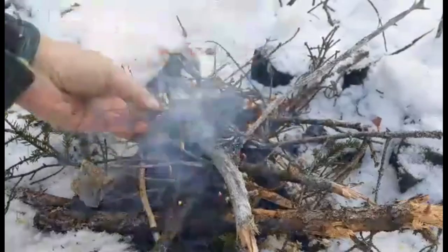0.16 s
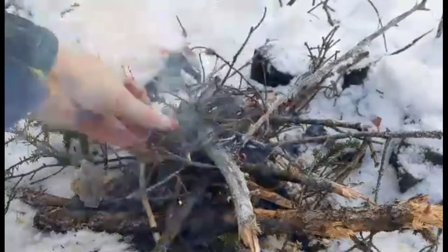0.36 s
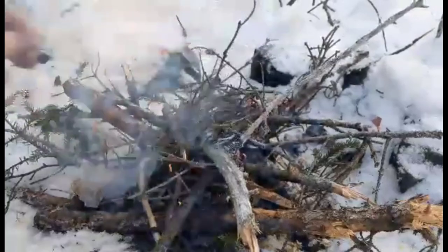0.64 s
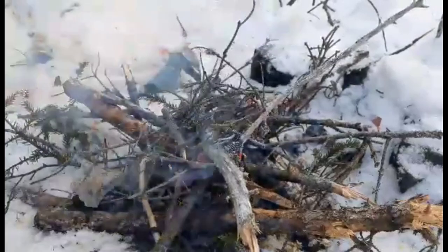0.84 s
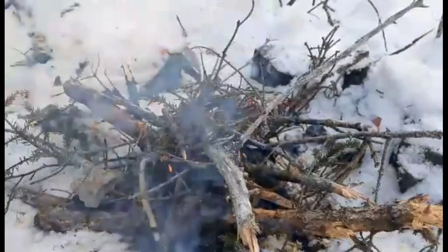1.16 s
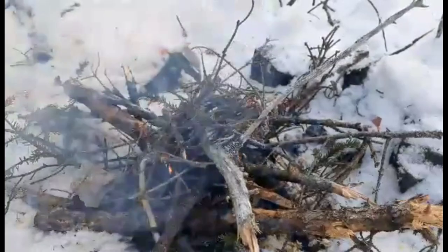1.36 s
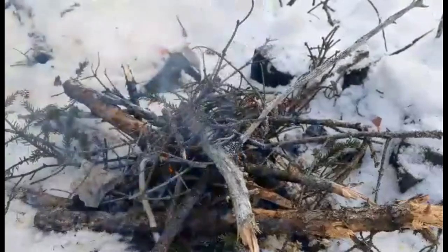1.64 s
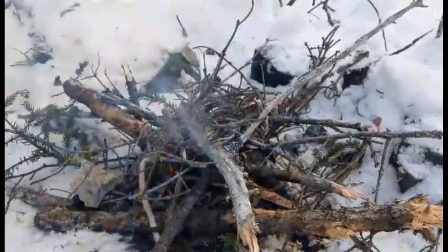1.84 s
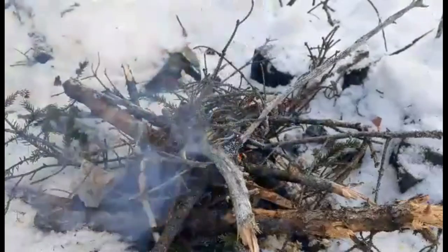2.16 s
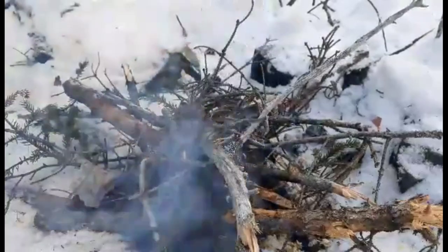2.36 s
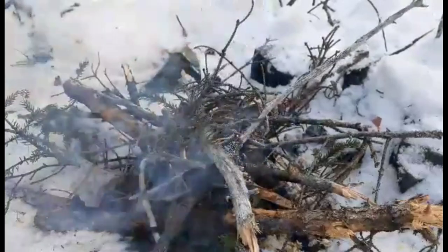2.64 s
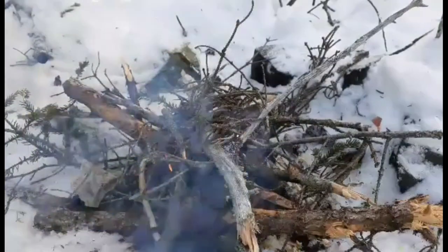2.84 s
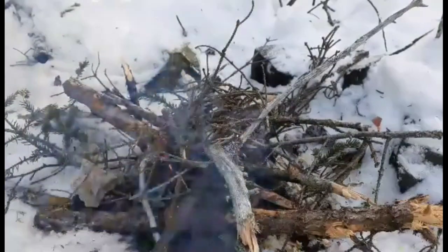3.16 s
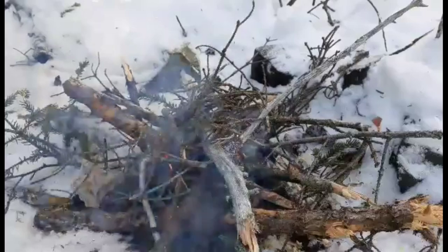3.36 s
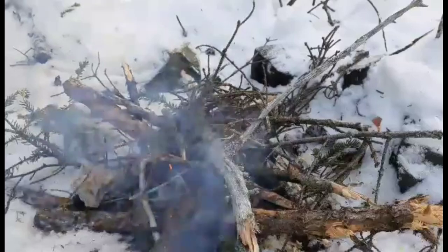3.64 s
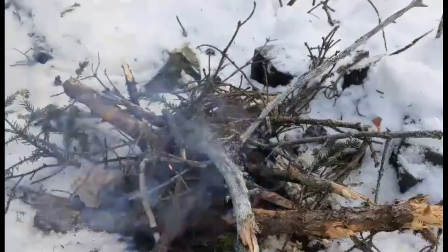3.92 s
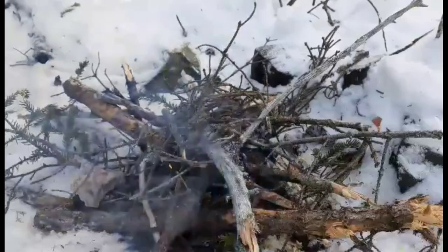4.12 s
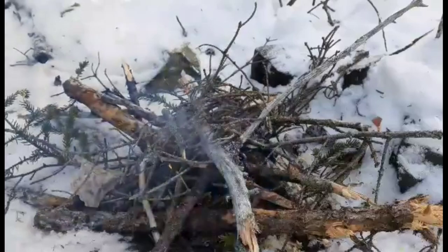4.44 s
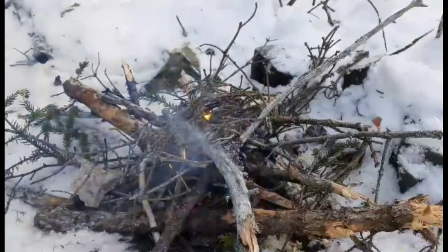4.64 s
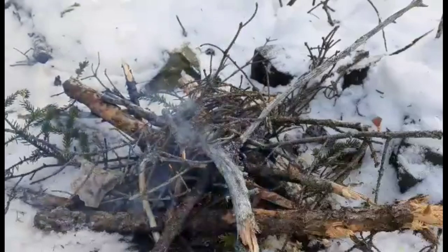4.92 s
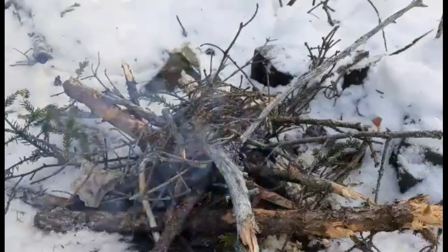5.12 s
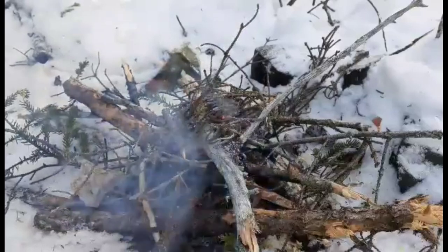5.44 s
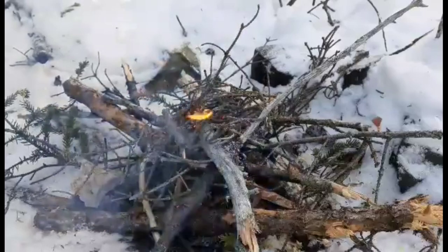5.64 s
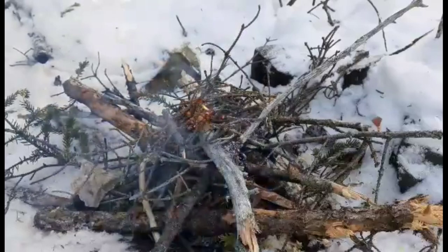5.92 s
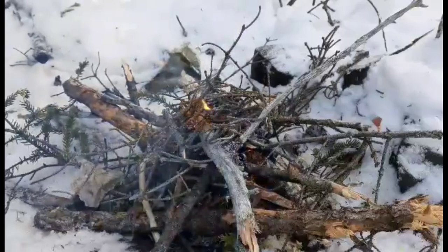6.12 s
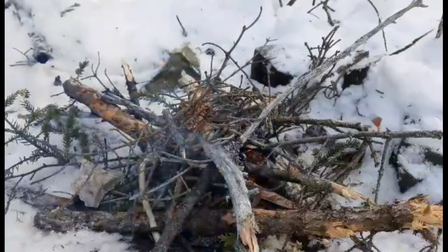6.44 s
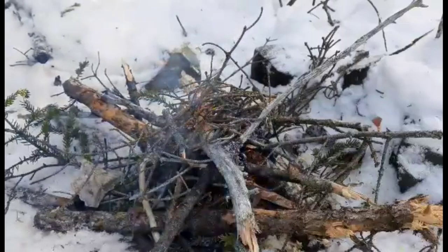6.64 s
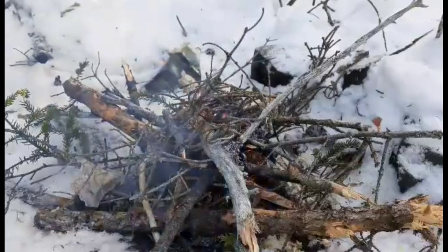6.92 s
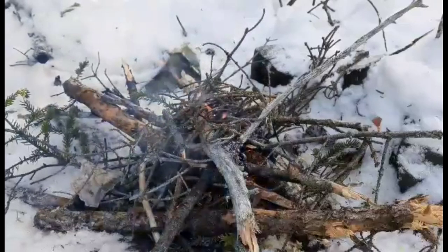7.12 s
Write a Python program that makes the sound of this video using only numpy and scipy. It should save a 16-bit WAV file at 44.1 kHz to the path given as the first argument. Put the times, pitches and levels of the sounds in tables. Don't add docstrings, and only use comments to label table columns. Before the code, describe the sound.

A small fire of dry twigs on snow, heard very close, leaning left, in dry open air. It begins quietly with a soft low puff, faint ticks and thin hiss. From about 0.75 s steam breathes harder; light cracks come near 1.25 s, then the strongest airy hisses swell at 1.6 to 1.7 and 2.05 s, with low flutter around 1.9. Near 2.4 to 3.4 s the hiss sinks and soft, low flame thumps and flaps take over. At 3.42 to 3.46 s a tiny rough whistle climbs to a shrill squeak and shuts, with two pops. After faint rustling, the loudest sharp snap hits at 4.12 s, another just after. A strong crack with spitting steam comes at 5.18, dull puffs at 5.4, pops and puffs at 6.1 to 6.2, a snap near 6.6, then a bright ringing cluster at 6.95 to 7.05 s and fading hiss.

```python
import sys
import numpy as np
from scipy import signal
from scipy.fft import rfft, irfft, next_fast_len
from scipy.io import wavfile
from scipy.ndimage import uniform_filter1d, minimum_filter1d, map_coordinates

SR = 44100
rng = np.random.default_rng(int(sys.argv[2]) if len(sys.argv) > 2 else 0)


def output_pcm(signal):
    pcm = np.clip(np.atleast_2d(signal).T, -1, 1) * 32767
    wavfile.write(sys.argv[1], SR, np.round(pcm).astype(np.int16))


def invert_db(x):
    u = np.asarray(x, float) / 20
    return 10 ** u


N = 320607

TOP_HZ, SHUT_HZ = 13130, 13230
PORT_LAG_S = 23.3 / SR

# start_s, peak_db, thick_wood_share_db, left_right_db, brightness_db_per_octave
POPS = [(0.0196, -42, -6, 7, 0), (0.3885, -39, -40, 5, 6), (1.2322, -36, -20, 5, -4),
        (1.267, -36, -12, 9, -11.5), (1.3202, -33.5, -24, 4, -8.5), (3.4348, -28, -15, 5.5, 0),
        (3.48, -30, -27, 8, 9), (4.116, -13, -38, 8.5, 4), (4.1496, -23, -16, 14, 8),
        (4.226, -39, -11.5, 6, 4), (4.9674, -43.5, -33, 6.5, 2), (5.0285, -48, -23, 5.5, 7),
        (5.1767, -17, -28, 11.5, -7), (6.0999, -35.5, -16.5, -2, 1), (6.136, -31, -2, 6.5, 1),
        (6.158, -22, -17.5, 6, 3), (6.5545, -41, -7, 6, 7.5), (6.587, -28, -39, 17, 4.5),
        (6.9433, -22, -31, 8.5, -4), (7.001, -18.5, -14.5, 8, 8.5), (7.0126, -41, -26, 0, 5),
        (7.0504, -34, -35, 11.5, 5), (7.216, -43.5, -26, 2, -3), (6.5818, -32, -40, 12, 11),
        (6.511, -44, -30, 8, 1), (6.9446, -25, -35, 8, -1.5), (6.995, -44, -30, 8, 4),
        (6.0906, -61, -10, 1, 3), (6.0642, -58, -25, 7, 3), (4.1302, -41, -40, 9, 15),
        (4.1372, -42, -40, 9, 12), (6.155, -37.5, -25, 7, 4)]
# start_s, peak_db, thick_wood_share_db, left_right_db
TICKS = [(0.143, -51, -18, 1), (0.209, -48, -19, 3), (0.563, -44.5, -34, 13), (0.7616, -40.5, -1.5, 4.5),
         (2.795, -44.5, -21, 18), (3.0794, -56, -15, 10), (3.845, -49.5, -24, 3), (4.3998, -42.5, -14, 12),
         (4.663, -44.5, -22, 7.5), (4.8678, -50, -20, 13), (6.039, -47.5, -16.5, 1), (6.168, -43, -14, 7),
         (6.419, -48.5, -8, 3.5), (5.409, -59, -1.5, 6), (1.167, -42, 0, 10), (6.149, -41, -12, 3)]
TICK_TILT_DB_PER_OCTAVE, CLUSTER_MS, PUSH_S = -2, 1.25, .00008
# freq_hz, level_db
CRACK_SPECTRUM = [(970, -58), (3100, -18), (5700, -7), (6400, -1), (7900, 0.6), (8700, -4), (11450, 0.86),
                  (12700, 1), (TOP_HZ, -2), (SHUT_HZ + 350, -23), (14000, -35)]
# delay_s, level_db
SNOW_ECHOES = [
    (.0034, -16),
    (.008, -26.5),
    (0.014, -24),
]

# start_s, peak_db, pitch_hz
KNOCKS = [(1.2671, -48, 1500), (4.116, -44, 2200), (4.1495, -35, 550), (4.1498, -41, 1150),
          (4.2273, -44, 2280), (4.91, -58, 1450), (5.1767, -50.5, 700), (5.178, -35, 3900), (6.1, -43, 805),
          (6.135, -37, 1300), (6.136, -36, 2900), (6.158, -38, 1840), (6.189, -49, 4000), (5.19, -52, 3800),
          (5.197, -50, 3800), (5.203, -52, 3800), (5.409, -52, 600), (5.416, -56, 1100), (6.038, -56, 2600),
          (6.1495, -45, 2000), (6.5148, -44, 1000), (6.515, -50, 2200), (6.5545, -49.5, 1800),
          (6.5875, -42, 5600), (6.9445, -38, 3100), (6.954, -45, 4200), (7, -30, 2900),
          (7.0017, -35.5, 1780), (7.013, -47, 3500)]
KNOCK_CYCLES, CYCLES_PER_KHZ = .5, .7

# start_s, end_s, from_hz, to_hz, peak_db
SQUEALS = [
    (3.416, 3.454, 1750, 2726, -37),
    (3.4522, 3.4594, 3700, 4370, -27),
    (3.4605, 3.4641, 6600, 12300, -23.5),
]
LATENESS_PER_S = 150

# peak_s, hiss_db, rise_ms, fall_ms, roar_share_db
SWELLS = [(0.0, -57, 50, 150, -11.5), (0.33, -66.5, 1400, 720, -23), (0.577, -65.5, 110, 110, -12.5),
          (0.768, -48, 210, 950, -9.5), (1.034, -47.5, 57, 170, -3.5), (1.17, -55.5, 80, 105, 3),
          (1.268, -44.5, 55, 7, -7), (1.605, -34.5, 57, 128, -9), (1.665, -33.5, 110, 88, -10.5),
          (1.91, -43, 117, 115, -7.5), (2.065, -32.5, 120, 160, -12.5), (2.497, -62.5, 1100, 520, -2.5),
          (2.742, -65.5, 51, 72, -2), (2.846, -58, 82, 92, -2), (3.09, -61, 250, 260, -0.5),
          (3.383, -55, 250, 340, -0.5), (3.425, -47.5, 40, 60, -4.5), (3.456, -44.5, 64, 12, -4),
          (3.59, -56, 76, 100, -7), (6.19, -57, 25, 20, -6), (3.8, -65.5, 220, 136, -13),
          (4.05, -64, 130, 150, -12), (4.4, -60, 520, 270, -6), (4.76, -67, 290, 78, -12),
          (5.53, -57, 140, 108, -14), (5.845, -59, 160, 115, -12), (6.49, -64.5, 220, 540, -5.5),
          (6.736, -59.5, 75, 56, -20)]
# start_s, hiss_db, fall_ms, roar_share_db
SPURTS = [(1.244, -46, 60, -8.5), (1.29, -61, 460, -1), (3.474, -51, 126, -3.5), (4.117, -47.5, 73, -12),
          (4.152, -49.5, 100, -12), (4.226, -53.5, 105, -8.5), (4.88, -64.5, 190, -5.5),
          (4.968, -61, 45, -8), (5.181, -42.5, 70, -25), (5.2, -57.5, 123, -22), (5.414, -65, 140, -1.5),
          (6.04, -75.5, 180, -8.5), (6.102, -59, 60, -5), (6.152, -48, 59, -5.5), (6.209, -63, 77, -7.5),
          (6.587, -54, 102, -10.5), (6.955, -48, 67, -14.5), (7.001, -48, 85, -9), (7.052, -60.5, 117, -4),
          (7.13, -68.5, 220, -6.5), (7.218, -66, 320, -9)]
# freq_hz, level_db
HISS_SPECTRUM = [(1300, -120), (3160, -16.5), (4130, -6), (7100, -4.5), (7800, -0.6), (7700, -1.5),
                 (9500, -5), (11060, -1.5), (12700, 0), (TOP_HZ, -1.5), (SHUT_HZ, -48.5), (16000, -81)]
# freq_hz, level_db
ROAR_SPECTRUM = [(300, -120), (700, -5.5), (1100, -4), (1700, -1.5), (2500, -1), (3500, -5.5), (5000, -7.5),
                 (9000, -120)]
# time_s, left_right_db
VENT_PLACE = [(0, 10), (0.28, -3), (0.71, 4), (1.09, 12), (1.4, 6), (1.5, 9), (2.13, 9.5), (2.61, 7),
              (2.83, 11), (3.08, 4), (3.7, 12), (4.31, 10), (5.3, 1.5), (5.45, 7.5), (6.0, 6), (6.55, 0),
              (6.78, 6), (7.27, 0)]
SPURT_RISE_MS, STEAM_ROUNDNESS = 6.8, 1.326
SEEP_HISS_DB, SEEP_ROAR_DB = -76.5, -88.5

# start_s, peak_db, pitch_hz
PUFFS = [(0.015, -42.5, 95), (0.375, -57, 88), (1.076, -50, 178), (1.2645, -37, 105), (1.916, -36, 136),
         (2.429, -54, 102), (2.725, -41.5, 99.6), (2.76, -43, 88), (2.816, -33.5, 73), (2.826, -39, 97),
         (2.869, -47, 72.7), (3.223, -42, 143), (3.874, -43.5, 131), (3.918, -47, 110), (4.1465, -39, 590),
         (4.148, -42, 75.3), (4.344, -58, 303), (4.358, -48.5, 139), (4.431, -46.5, 138),
         (5.405, -41.5, 189), (5.422, -41, 343), (5.431, -49, 203), (5.44, -51, 231), (6.136, -40, 199),
         (6.204, -33.5, 297), (6.211, -52, 128), (6.218, -39, 369), (6.224, -44, 118), (6.549, -50, 195)]
# start_s, peak_db, pitch_hz
FLAPS = [
    (2.805, -46, 110),
    (3.03, -49, 200),
    (3.082, -47, 120),
    (3.115, -44, 140),
    (3.145, -48, 95),
    (3.262, -45, 115),
    (3.307, -46, 125),
    (3.352, -46, 120),
    (1.868, -42, 110),
    (1.972, -38, 120),
]

# peak_s, flutter_db, rise_ms, fall_ms, rustle_share_db
FLICKERS = [(0.195, -64.5, 78, 79, -8.5), (0.393, -68.5, 150, 64, -16), (0.669, -67.5, 150, 31, -0.5),
            (0.823, -74, 490, 890, -8), (1.63, -58, 76, 360, -7), (1.928, -53.5, 280, 160, -27),
            (1.979, -50, 27, 27, -9), (3.449, -56, 400, 130, -5), (3.6, -62.5, 150, 89, -7.5),
            (4.376, -68.5, 510, 110, -1.5), (4.67, -76.5, 180, 44, 0), (4.717, -75.5, 98, 210, -3),
            (4.918, -83.5, 21, 210, 2), (5.057, -79.5, 52, 140, -13), (5.55, -66, 79, 83, -15),
            (5.883, -62.5, 130, 46, -11), (6.266, -63, 430, 410, -19), (6.57, -65, 430, 190, -1),
            (7.005, -64.5, 230, 95, -16), (7.056, -60, 28, 115, -8.5), (7.246, -66.5, 68, 740, -15)]
# start_s, flutter_db, fall_ms, rustle_share_db
FLARES = [(0.007, -54, 110, -11), (1.087, -56.5, 81, 1), (1.167, -65.5, 460, 3), (1.262, -54, 140, -6),
          (2.088, -59, 310, 0), (2.416, -66, 135, -1.5), (2.736, -51.5, 51, -16), (2.821, -45, 69, -15.5),
          (3.039, -58, 370, -8), (3.234, -57, 270, -14), (3.878, -56.5, 79, -12), (4.154, -61, 67, -19),
          (4.433, -58, 83, -12), (5.179, -62, 180, -7), (5.414, -62, 144, -1.5), (5.814, -64.5, 220, -18),
          (6.134, -48, 36, 1.5), (6.212, -48, 46, -0.5), (6.476, -62.5, 35, -2), (6.736, -59, 100, -13)]
# freq_hz, level_db
FLUTTER_SPECTRUM = [(15, -120), (30, -29), (50, -7), (80, -1.5), (120, -2), (180, -5.5), (280, -14.5),
                    (600, -34), (1500, -120)]
# freq_hz, level_db
RUSTLE_SPECTRUM = [(120, -120), (230, -7), (400, -1.5), (700, -2.5), (1200, -14), (2500, -31), (6000, -120)]
FLARE_RISE_MS, FLAME_ROUNDNESS = 15.8, 1.35
EMBER_FLUTTER_DB, EMBER_RUSTLE_DB = -83, -84.5
FANNING_DB = -10.5

# freq_hz, level_db
PORT_SHADOW = [(60, -5), (400, -6), (1400, -5), (2400, -7.5), (3800, -4), (6000, -3.5), (9000, -8.5),
               (13000, -9)]
# freq_hz, likeness_0_to_1
PORT_LIKENESS = [(25, 0.8), (70, 1), (500, 0.91), (1700, 0.65), (2500, 0.27), (3800, 0.56), (6000, 0.084),
                 (13000, 0.13)]
# freq_hz, level_db
DROPOUT_LEVEL = [(900, -32), (1900, -17), (2600, -13), (3500, -8), (4800, -6), (6000, -11.5), (13000, -5)]
# freq_hz, bias_sigma
CHOP_BIAS = [(1500, -1.5), (3000, -.2), (4800, .7), (7000, -.2), (10000, .1), (13000, -.3)]
CHOP_ODDS_SIGMA, CHOP_SCATTER_DB = 1.25, 3.5
CHOP_JUMP_DB, CHOP_UNDER_DB = 8, 8


def unit(x):
    return x / np.sqrt(np.mean(x ** 2) + 1e-20)


def along(points, hz):
    f, v = np.transpose(points)
    return np.interp(np.log(hz + 1), np.log(f + 1), v)


def curves(rows):
    s, *cols = np.transpose(rows)
    return [np.interp(np.arange(N) / SR, s, c) for c in cols]


def wobble(rate_hz):
    knots = rng.standard_normal(int(N * rate_hz / SR) + 4)
    return map_coordinates(knots, [np.arange(N) * rate_hz / SR])


def filtered(x, response):
    m = next_fast_len(x.shape[-1] + 2048)
    return irfft(rfft(x, m) * response(np.fft.rfftfreq(m, 1 / SR)), m)[..., :x.shape[-1]]


def ports(pair, lag_s, extra_db=0):
    alike = lambda hz: np.clip(along(PORT_LIKENESS, hz), 0, 1)
    path = lambda hz: invert_db(along(PORT_SHADOW, hz) + extra_db) * np.exp(-2j * np.pi * hz * lag_s)
    right = filtered(pair, lambda hz: path(hz) * [alike(hz), np.sqrt(1 - alike(hz) ** 2)]).sum(axis=0)
    return np.array([pair[0], right])


def rush(spectrum, patchy_db, gusts_db):
    z = signal.stft(rng.standard_normal((2, N)) * invert_db(gusts_db), nperseg=512)[2]
    field = uniform_filter1d(rng.standard_normal(z.shape[1:]), size=7, axis=0)
    field = uniform_filter1d(field, size=6, axis=1)
    pair = signal.istft(z * invert_db(patchy_db * unit(field)), nperseg=512)[1][:, :N]
    both = ports(filtered(pair, lambda hz: invert_db(along(spectrum, hz))), PORT_LAG_S)
    return both / np.std(both.mean(axis=0))


def surges(slow, sudden, rise_ms, roundness):
    torn = [(s, db, rise_ms, fall_ms, share_db) for s, db, fall_ms, share_db in sudden]
    s, db, rise, fall, share_db = np.array(list(slow) + torn).T[:, :, None]
    grid = np.arange(0, N + 44, 44)
    ms = (grid / SR - s) * 1000
    span_ms = np.where(ms < 0, abs(rise), abs(fall))
    power = invert_db(db - 20 * (abs(ms) / span_ms) ** roundness) ** 2
    return [np.interp(np.arange(N), grid, p.sum(axis=0)) for p in (power, power * invert_db(share_db) ** 2)]


def crack_cluster(t):
    rise = np.minimum(t - .0006, 0) / 0.0004
    fall = np.maximum(t - .0006 - CLUSTER_MS / 2000, 0) / (CLUSTER_MS * 0.00087 + .0001)
    return np.exp(rise - fall)


def pops():
    out, t = np.zeros((2, N + SR)), np.arange(SR // 16) / SR - .004
    crack = lambda hz: invert_db(along(CRACK_SPECTRUM, hz))
    cluster = crack_cluster(t) + sum(invert_db(db) * crack_cluster(t - delay) for delay, db in SNOW_ECHOES)
    u = np.maximum(t - .0012, 0) / PUSH_S
    push = (t > .0012) * (1 - 0.92 * u) * np.exp(-u)
    for s, db, thick_db, pan_db, tilt_db in POPS + [(*tick, TICK_TILT_DB_PER_OCTAVE) for tick in TICKS]:
        noise = rng.standard_normal((4, 2, len(t)))
        bright = lambda hz: crack(hz) * invert_db(tilt_db * np.log2(hz / 8000 + .01))
        thin = filtered(noise[0] * abs(noise[0]) ** .5 * cluster, bright)
        thick = filtered(noise[1] * cluster ** 2, lambda hz: invert_db(along(ROAR_SPECTRUM, hz)))
        thick = 0.53 * thick / abs(thick[0]).max() - push
        grit = invert_db(5.9 * unit(uniform_filter1d(noise[3, 0], size=70)))
        vent = (t > .001) * invert_db(-29.0 - 60 * t / 0.02) * unit(filtered(noise[2] * grit, crack))
        burst = thin / abs(thin[0]).max() + invert_db(thick_db + 6.5) * thick / abs(thick[0]).max() + vent
        side = np.clip(pan_db / 9, .2, 1)
        heard = invert_db(db + 6.5) * ports(burst, side * PORT_LAG_S, 7.5 - pan_db)
        out[:, round((s - .004) * SR):][:, :len(t)] += heard
    return out[:, :N]


def knocks():
    out, t = np.zeros(N + SR), np.arange(SR // 50) / SR
    for s, db, hz in KNOCKS:
        decay = np.exp(-hz * t / (KNOCK_CYCLES + CYCLES_PER_KHZ * hz * .001))
        ring = np.sin(2 * np.pi * hz * t) * decay * (1 - np.exp(-hz * t / .4))
        out[round((s + .0008) * SR):][:len(t)] += invert_db(db + 3.5) * ring / abs(ring).max()
    return out[:N]


def squeals():
    out, waver, rough, breathy = np.zeros(N), wobble(1100), wobble(500), wobble(2500)
    for start, end, low_hz, high_hz, db in SQUEALS:
        u = np.clip((np.arange(N) / SR - start) / (end - start), 0, 1)
        pitch_hz = low_hz * (high_hz / low_hz) ** u * (1 + .04 * waver)
        phase = 2 * np.pi * np.cumsum(pitch_hz) / SR
        swell = (u ** (LATENESS_PER_S * (end - start)) + 0.46 * u) * (1 - u) ** 0.58
        tone = np.sin(phase) + 0.55 * breathy * np.cos(phase)
        out += invert_db(db + 3.0 * rough) * swell / swell.max() * tone
    return out


def steam(hiss_power, roar_power):
    sputter = wobble(260)
    hiss = np.sqrt(hiss_power + invert_db(SEEP_HISS_DB) ** 2)
    hiss = hiss * rush(HISS_SPECTRUM, patchy_db=2.5, gusts_db=0.88 * sputter + 0.72 * wobble(30))
    hiss[1] *= invert_db(0.48 * (3.0 - curves(VENT_PLACE)[0]))
    roar = np.sqrt(roar_power + invert_db(SEEP_ROAR_DB) ** 2)
    roar = roar * rush(ROAR_SPECTRUM, patchy_db=2.5, gusts_db=1.0 * sputter + 1.0 * wobble(25))
    return hiss + invert_db(0.5) * roar


def puffs(rows):
    out, t = np.zeros(N + SR), np.arange(SR // 10) / SR
    for s, db, hz in rows:
        phase = 2 * np.pi * hz * t
        front = 0.49 * np.sin(3.31 * phase + rng.uniform(0, 2 * np.pi)) * np.exp(-1.3 * hz * t)
        swing = (np.sin(phase) + front) * np.exp(-1.1 * hz * t) * (1 - np.exp(-hz * t / .12))
        out[round((s + .003) * SR):][:len(t)] -= invert_db(db + 1.5) * swing / swing.max()
    return out[:N]


def flame(roar_power):
    flutter, rustle = surges(FLICKERS, FLARES, FLARE_RISE_MS, FLAME_ROUNDNESS)
    lumps = 2.0 * np.tanh(wobble(28) / 1.5)
    low = np.sqrt(invert_db(2.0) ** 2 * flutter + invert_db(EMBER_FLUTTER_DB) ** 2)
    low = low * rush(FLUTTER_SPECTRUM, patchy_db=1.5, gusts_db=2.4 * lumps)
    rustle = np.sqrt(rustle + invert_db(FANNING_DB) ** 2 * roar_power + invert_db(EMBER_RUSTLE_DB) ** 2)
    rustle = rustle * rush(RUSTLE_SPECTRUM, patchy_db=2.5, gusts_db=1.6 * lumps + 2.1 * wobble(70))
    return low + invert_db(1.44) * rustle


def scene():
    whistle, air = squeals() + knocks(), puffs(PUFFS)
    hiss_power, roar_power = surges(SWELLS, SPURTS, SPURT_RISE_MS, STEAM_ROUNDNESS)
    scatter = np.roll(air, 150) + np.roll(whistle, 30)
    close = ports(np.array([air + whistle, scatter]), PORT_LAG_S)
    flaps = ports(puffs(FLAPS) * np.ones((2, 1)), PORT_LAG_S)
    return pops() + close + steam(hiss_power, roar_power) + flaps + flame(roar_power)


def thinned(x):
    hz, _, z = signal.stft(x, SR, nperseg=1024)
    bands = np.arange(len(hz)) // 8
    power = uniform_filter1d((abs(z) ** 2).sum(axis=0), size=8, axis=0, origin=-4)[bands * 8]
    treble = power[(hz > 5000) & (hz < TOP_HZ)].mean(axis=0)
    sudden = treble > 5 * np.roll(treble, 2)
    level_db = 10 * np.log10(power / treble + 1e-12)
    level_db += .16 * 10 * np.log10(treble / np.median(treble) + 1e-12)
    whim = unit(uniform_filter1d(rng.standard_normal(level_db.shape), size=9, axis=1))[bands]
    kept = np.clip(.5 + (level_db - along(DROPOUT_LEVEL, hz)[:, None] + 2.4 * whim), invert_db(-34), 1)
    gain = np.where((hz[:, None] > TOP_HZ) | sudden, 1, kept)
    return signal.istft(z * gain, SR, nperseg=1024)[1][:, :N]


def chopped(x):
    hz, _, z = signal.stft(x, SR, nperseg=256)
    treble_db = 10 * np.log10((abs(z[:, hz > 3000]) ** 2).sum(axis=(0, 1)) + 1e-14)
    attack = treble_db - minimum_filter1d(treble_db, size=5, origin=2) > CHOP_JUMP_DB
    near = uniform_filter1d(attack * 1., size=27) > 1e-6
    peak_db = -minimum_filter1d(-treble_db, size=27)
    quiet = treble_db < peak_db - CHOP_UNDER_DB
    tiles = np.ix_(np.arange(len(hz)) // 5, np.arange(z.shape[2]) // 3)
    lot, scatter = rng.standard_normal((2, *z.shape[1:]))
    odds = lot[tiles] - along(CHOP_BIAS, hz)[:, None] + CHOP_ODDS_SIGMA
    kept = np.clip(.5 + 8 * odds, invert_db(-36), 1)
    gain = np.where(near & quiet, kept * invert_db(CHOP_SCATTER_DB * scatter[tiles]), 1)
    return signal.istft(z * gain, SR, nperseg=256)[1][:, :N]


def band_limit(x):
    return signal.sosfilt(signal.butter(12, 14360, fs=SR, output="sos"), x)


def record(dry):
    heard = filtered(dry, lambda hz: (1j * hz / (1j * hz + 42)) ** 2)
    mix = chopped(thinned(heard))
    return band_limit(mix)


dry = scene()
out = record(dry)
output_pcm(out)
```